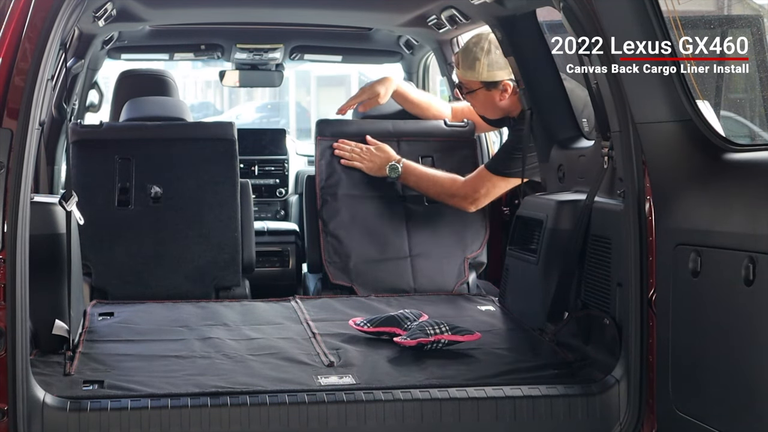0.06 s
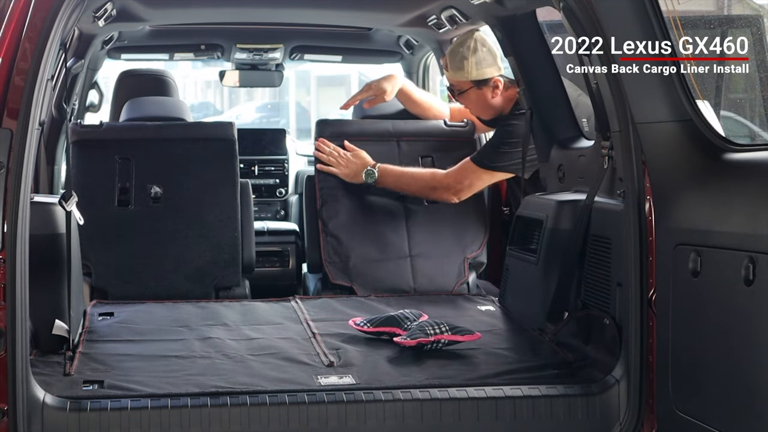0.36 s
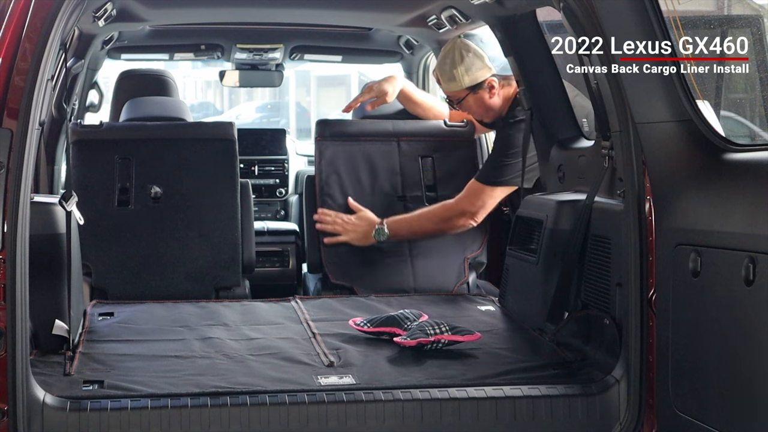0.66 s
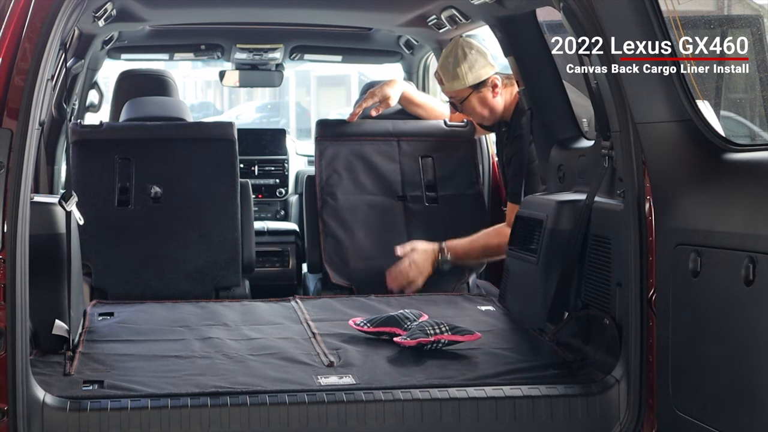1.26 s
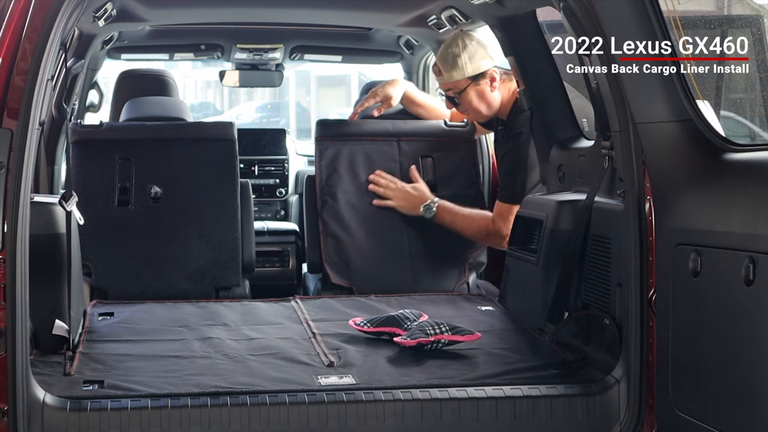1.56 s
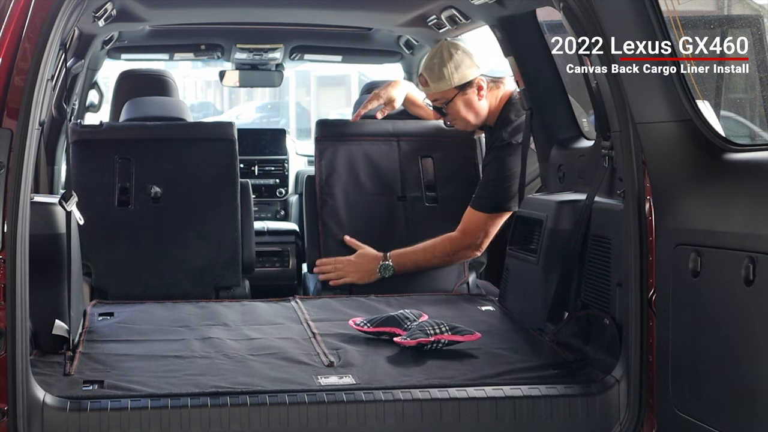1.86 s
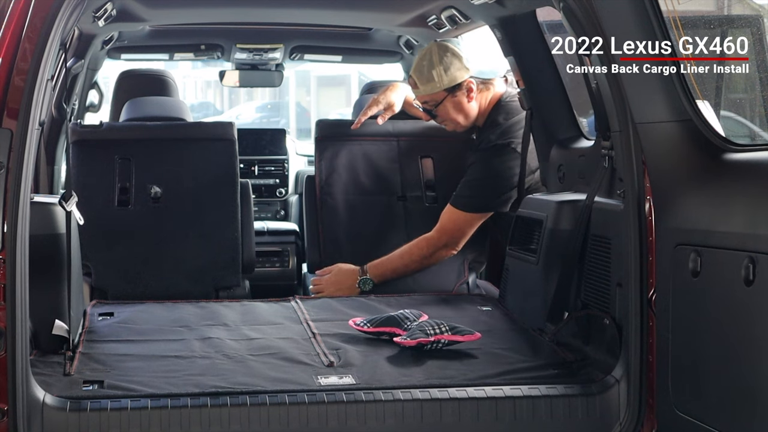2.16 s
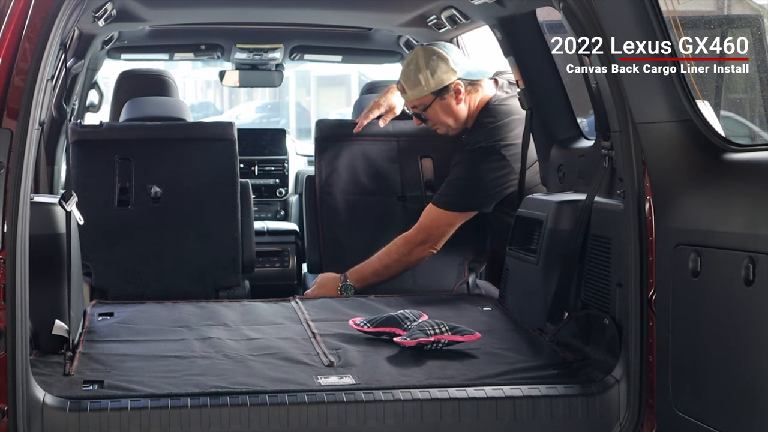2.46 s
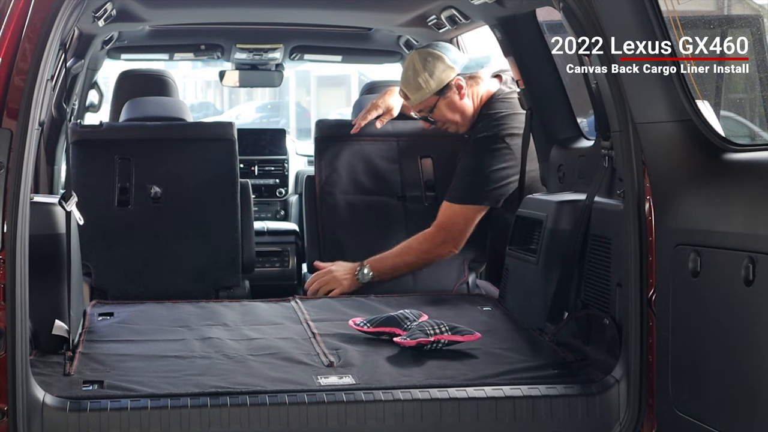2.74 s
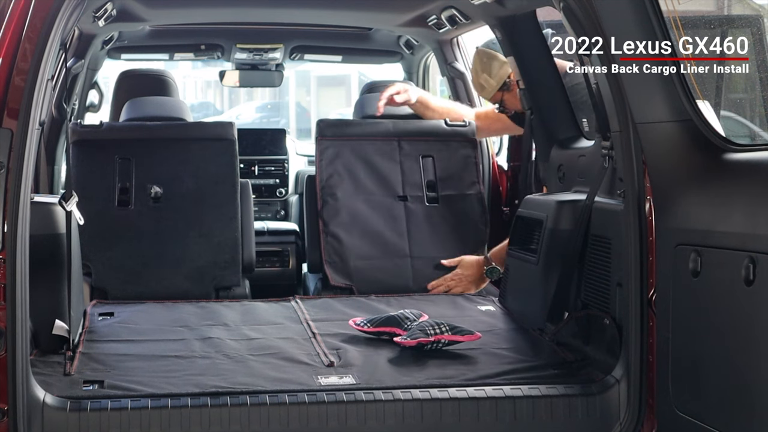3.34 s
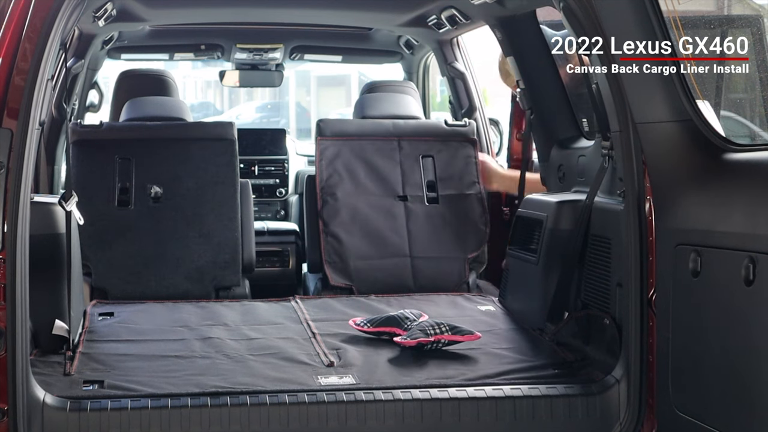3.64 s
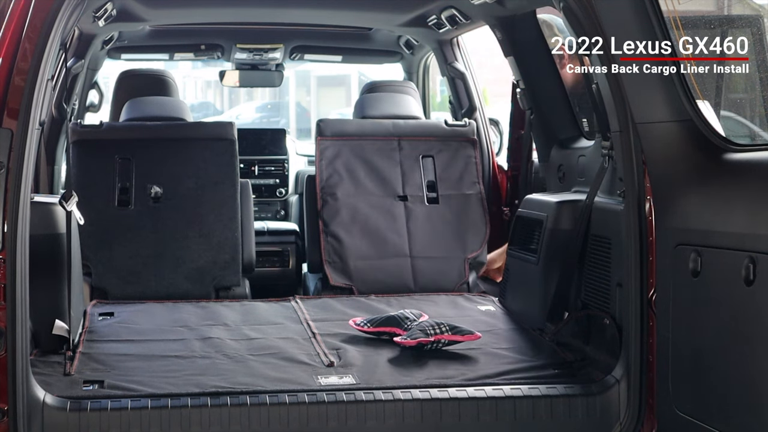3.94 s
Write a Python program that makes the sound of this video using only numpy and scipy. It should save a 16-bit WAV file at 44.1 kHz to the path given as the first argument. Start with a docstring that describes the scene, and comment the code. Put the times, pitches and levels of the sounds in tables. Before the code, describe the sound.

Three swishing sweeps of a hand over canvas, with slaps, light knocks and a low rumble.

```python
"""Smoothing a canvas seat liner

In the cargo bay of a parked car, a hand smooths canvas over a seat back. Three long strokes hiss as
skin snags on the weave, the last two starting with a slap of the palm. Fingers knock the padded panel,
the cloth ticks as it settles, the palm sticks and groans once, and a low rumble fills the cabin."""
import sys
import numpy as np
from scipy import signal
from scipy.fft import rfft, irfft
from scipy.io import wavfile
from scipy.ndimage import map_coordinates

SR = 44100
rng = np.random.default_rng(int(sys.argv[2]) if len(sys.argv) > 2 else 0)


def pcm_store(signal):
    """Save signal as 16-bit PCM."""
    levels = np.round(np.clip(np.atleast_2d(signal), -1, 1) * 32767)
    wavfile.write(sys.argv[1], SR, levels.astype(np.int16).T)


N = 176400
TIME = np.arange(N) / SR


def from_db(db):
    """Decibels to gain."""
    return 10 ** (np.asarray(db) / 20)


def unit_rms(x):
    """Scale to an rms of 1."""
    return x / np.sqrt(np.mean(x ** 2) + 1e-20)


def automation(rows, outside=None):
    """Turn rows of a time and its values into one curve per value."""
    times, *columns = np.transpose(rows)
    return [np.interp(TIME, times, column, outside, outside) for column in columns]


def coloured(x, spectrum):
    """Give steady noise a spectrum that falls away below its first point; rms 1."""
    hz, db = np.transpose(spectrum)
    f = np.maximum(np.fft.rfftfreq(N, 1 / SR), 1)
    gain = from_db(np.interp(np.log(f), np.log(hz), db)) * np.minimum(f / hz[0], 1) ** 2
    return unit_rms(irfft(rfft(x) * gain, N))


def noise(spectrum):
    """Smooth noise of a given colour."""
    return coloured(rng.standard_normal(N), spectrum)


def drift(rate_hz):
    """A random wobble, mostly slower than rate_hz; rms 1."""
    f = np.fft.rfftfreq(N, 1 / SR)
    return unit_rms(irfft(rfft(rng.standard_normal(N)) / (1 + (f / rate_hz) ** 2), N))


def burst(start, rise, hold, t60):
    """An envelope that rises up to the start, holds and dies away; times in seconds."""
    t = TIME - start
    attack = np.clip(1 + t / max(rise, 1e-4), 0, 1)
    return attack * from_db(-60 * np.clip((t - hold) / t60, 0, 2))


# The colour of the rumble. Each row: frequency in Hz, relative level in dB.
RUMBLE_COLOUR = [(20, -9), (45, -8), (90, -2.5), (200, -4), (300, 1.5), (450, -8.5), (900, -6), (1300, -12),
                 (2200, -18), (9000, -33), (15000, -31)]


def rumble():
    """A steady bed of low noise fills the cabin."""
    return noise(RUMBLE_COLOUR) * from_db(-38)


# The swell of each stroke. Each row: time in seconds, hiss level in dB, murmur level in dB.
DOWN_LEVELS = [(0, -22, -31), (.32, -27, -33.5), (.48, -25.5, -30), (.57, -17, -32.5), (.67, -15, -27),
               (.92, -15, -30.5), (.99, -19, -31), (1.17, -23.5, -33.5), (1.21, -39.5, -34),
               (1.28, -50, -38), (1.45, -56, -53)]
ACROSS_LEVELS = [(1.59, -37, -21), (1.62, -24.5, -29), (1.675, -16, -25.5), (1.8, -15, -54),
                 (1.89, -14.5, -43), (1.98, -18.5, -34), (2.04, -27, -33), (2.35, -32, -36),
                 (2.53, -34.5, -36), (2.7, -53, -43)]
OUT_LEVELS = [(3.062, -24.5, -33), (3.16, -21, -34), (3.31, -21.5, -35), (3.36, -26.5, -28.5),
              (3.42, -26, -26), (3.55, -31.5, -34), (3.61, -52, -32.5), (3.7, -91, -37), (4, -49, -42.5)]
# A close reflection combs the hiss as the hand travels.
# Each row: time in seconds, spacing of the dips in Hz, signed strength.
DOWN_COMB = [(0, 2680, .16), (.3, 2750, 0.09), (.7, 3080, 0.022), (1.15, 3470, 0.21)]
ACROSS_COMB = [(1.85, 3080, 0.013), (2.25, 3080, 0.21), (2.65, 2800, .2)]
OUT_COMB = [(3.06, 2550, -0.4), (3.15, 2540, -0.12), (3.31, 3160, -0.31), (3.55, 4150, -0.38)]
# The colour of each hiss and of the panel's murmur. Each row: frequency in Hz, relative level in dB.
DOWN_COLOUR = [(600, -18), (820, -13), (1100, -0.5), (1500, -1), (2300, 0.5), (5300, -0.5), (7200, -7),
               (14500, -12.5)]
ACROSS_COLOUR = [(680, -15.5), (950, -3.5), (1400, -7), (2300, 0), (4300, -1.5), (6700, -7), (8800, -11.5),
                 (13500, -15.5)]
OUT_COLOUR = [(500, -36), (1000, -5), (1700, 1), (3800, 0.5), (8000, -5), (13500, -15)]
MURMUR_COLOUR = [(70, 0.5), (120, 5), (280, -1), (450, 8), (1080, 6.5), (2500, -19.5)]


def stroke(levels, comb, colour):
    """Skin rubs the weave; returns its hiss, hollowed by a close reflection, and the panel's murmur."""
    snags_per_s, snag_spread_db, snag_db = 2800, 1.5, -7.5   # threads catching on the skin
    sizes = from_db(snag_spread_db * np.minimum(rng.exponential(1, N), 6)) * rng.choice([-1, 1], N)
    snags = unit_rms(sizes * (rng.random(N) < snags_per_s / SR))
    hiss = coloured(rng.standard_normal(N) + from_db(snag_db) * snags, colour)
    spacing_hz, strength = automation(comb)
    once, twice = (map_coordinates(hiss, [np.arange(N) - trips * SR / spacing_hz], order=3)
                   for trips in (1, 2))
    hiss = hiss + strength * once - .5 * np.abs(strength) * twice   # the second bounce narrows the dips
    hiss_db, murmur_db = automation(levels, outside=-120)
    grip = drift(rate_hz=37.7)   # flutters both levels together
    return np.array([unit_rms(hiss) * from_db(hiss_db + 0.47 * grip),
                     noise(MURMUR_COLOUR) * from_db(murmur_db + 2 * grip)])


def moving_peak(x, hz, width_hz, block=256):
    """A resonance whose centre glides, stepped in blocks."""
    r = np.exp(-np.pi * width_hz / SR)
    b = np.array([1, 0, -1]) * (1 - r * r) / 2
    out, state = np.zeros(N), np.zeros(2)
    for i in range(0, N, block):
        a = [1, -2 * r * np.cos(2 * np.pi * hz[i] / SR), r * r]
        out[i:i + block], state = signal.lfilter(b, a, x[i:i + block], zi=state)
    return out


# Air pockets under the moving hand.
# Each row: start and end in seconds, first and last pitch in Hz, boost or dip in dB.
AIR_POCKETS = [(0.493, 0.818, 1990, 2050, 5.5), (0.54, 0.834, 1170, 1060, 4.5),
               (.62, 1.235, 4400, 3600, 3.5), (1.159, 1.5, 2380, 2820, 13), (1.605, 1.796, 5150, 4850, 4.5),
               (1.623, 2.107, 3300, 2980, 2.5), (1.98, 2.622, 7550, 7800, -6),
               (3.32, 3.63, 1630, 2500, 7.5)]


def air_pockets(hiss, q=10.4, fade_s=0.041):
    """Air trapped under the hand boosts or swallows a gliding band of the hiss."""
    for start, end, from_hz, to_hz, db in AIR_POCKETS:
        hz = np.interp(TIME, [start, end], [from_hz, to_hz])
        fade = np.clip(np.minimum(TIME - start, end - TIME) / fade_s, 0, 1)
        hiss = hiss + (from_db(db) - 1) * fade * moving_peak(hiss, hz, from_hz / q)
    return hiss


# The modes of the padded seat back. Each row: frequency in Hz, relative level in dB, T60 in seconds.
PANEL_MODES = [(99, -9, 0.24), (150.4, -1.5, 0.091), (198, -7.5, 0.11), (265, 1.5, 0.037), (386, -1, 0.024),
               (495, -1.5, 0.025), (747, -9, 0.018), (915, -5, 0.028), (1090, -5, 0.016),
               (1302, -3.5, 0.018)]


def panel(blows, width_oct=0.64, spread_db=3.5):
    """Blows (seconds, dB, Hz) ring the seat back; each favours the modes near its own tone."""
    starts, db, tone_hz = np.transpose(blows)
    onsets = np.clip((starts * SR).astype(int), 0, N - 1)
    scatter_db = spread_db * rng.standard_normal((len(starts), len(PANEL_MODES)))
    out = np.zeros(N)
    for k, (hz, mode_db, t60) in enumerate(PANEL_MODES):
        nearness = 1 / (1 + (np.log2(hz / tone_hz) / width_oct) ** 2)
        clicks = np.full(N, 1e-18)
        clicks[onsets] = nearness * from_db(db + mode_db + scatter_db[:, k])
        r, w = np.exp(-np.log(1000) / (t60 * SR)), 2 * np.pi * hz / SR
        out += (-1) ** k * signal.lfilter([0, np.sin(w)], [1, -2 * r * np.cos(w), r * r], clicks)
    return out


# Fingers knocking the panel. Each row: start in seconds, level in dB, centre of the tone in Hz.
FINGER_KNOCKS = [(0.9592, -7.5, 1150), (0.9996, -5.5, 990), (1.040, -8.5, 755), (1.078, -5.5, 820),
                 (1.095, -18.5, 202), (1.197, -17, 550), (1.43, -21, 880), (1.649, -6, 960),
                 (1.899, -9.5, 446), (1.932, -21, 302), (2, -12, 830), (2.191, -8, 790),
                 (2.531, -22.5, 300), (2.898, -19, 360), (3.363, -22, 280), (3.405, -14, 101),
                 (3.424, -17, 232), (3.467, -22, 268), (3.495, -23, 232), (3.971, -26, 242)]


def knocks(push_db=-1.5, second_gap_s=0.00418, second_db=-6.5):
    """A finger bumps the panel and rebounds for a second, softer hit; the first contact also gives the cloth
    one short push."""
    pushes, rebounds = np.zeros(N), []
    for start, db, hz in FINGER_KNOCKS:
        phase = np.clip(2 * np.pi * hz * (TIME - start), -20, 20)
        pushes += from_db(db + push_db) * phase * np.exp(-phase ** 2 / 2)
        rebounds.append((start + second_gap_s * rng.uniform(0.48, 2.02), db + second_db, hz))
    return pushes + panel(FINGER_KNOCKS) + panel(rebounds)


# Ticks and brushes of settling cloth. Each row: peak time in seconds, level in dB, rise and T60 in seconds.
CLOTH_TICKS = [(1.219, -19.5, 0.0015, 0.038), (1.233, -24, 0.0013, 0.04), (1.262, -27, 0.00092, 0.027),
               (1.35, -36, 0.0019, .028), (1.431, -35, 0.0011, 0.02), (2.78, -36, 0.045, 0.3),
               (2.806, -28, 0.0013, 0.052), (2.898, -35, .001, 0.016), (3.686, -23, 0.00086, 0.028),
               (3.701, -26, 0.00091, 0.012)]
# Their crisp colour. Each row: frequency in Hz, relative level in dB.
TICK_COLOUR = [(700, 4), (2600, 10.5), (6500, 1), (14000, -16)]


def ticks():
    """Short crisp rustles as folds let go."""
    envelope = sum(from_db(db) * burst(peak, rise, 0, t60) for peak, db, rise, t60 in CLOTH_TICKS)
    return noise(TICK_COLOUR) * envelope


# Slaps of the palm. Each row: start in seconds, smack level in dB, lead of the fingertips in seconds,
# fingertip level in dB, thump level in dB, delay of the heel in seconds.
PALM_SLAPS = [(1.575, -8.5, 0.0036, -14.5, -3.5, 0.0075), (3.0784, -8, 0.0083, -15.5, -2, .0056)]
# The colour of the smack. Each row: frequency in Hz, relative level in dB.
SMACK_COLOUR = [(170, -0.5), (320, 6.5), (650, 6), (1050, 8), (1700, 1), (14000, -34)]


def slaps(t60=0.055, tips_hz=3280, thump_hz=293, heel_db=-8):
    """Fingertips land first, then the palm smacks the cloth and, with the heel, thumps the panel."""
    tips = noise([(tips_hz / 3, 0), (tips_hz, -2), (7000, -10), (14000, -20)])
    smack = noise(SMACK_COLOUR)
    out, blows = np.zeros(N), []
    for start, smack_db, lead, tips_db, thump_db, heel_delay in PALM_SLAPS:
        out += tips * from_db(tips_db) * burst(start - lead, rise=0, hold=lead, t60=t60)
        out += smack * from_db(smack_db) * burst(start, rise=0.0019, hold=0.004, t60=t60)
        blows += [(start, thump_db, thump_hz), (start + heel_delay, thump_db + heel_db, thump_hz)]
    return out + panel(blows)


def groan(pitch_hz=294, waver_hz=24):
    """The palm briefly sticks and slips on the cloth at a wavering low pitch."""
    phase = 2 * np.pi * np.cumsum(pitch_hz + waver_hz * drift(rate_hz=37.7)) / SR
    return from_db(-26) * np.sin(phase) * burst(start=2.12, rise=0.019, hold=0.038, t60=0.076)


def cabin(x, t60=0.14, cutoff_hz=6000):
    """A short, dull tail from the upholstered cabin, arriving from the sides."""
    t = TIME[:SR // 4]
    tail = rng.standard_normal(len(t)) * np.exp(-np.log(1000) * t / t60)
    tail = signal.sosfilt(signal.butter(1, cutoff_hz, fs=SR, output="sos"), tail)
    reverb = signal.fftconvolve(x, tail / np.linalg.norm(tail))[:N]
    return np.array([reverb, -reverb])   # opposite polarity left and right


def scene():
    """Hand and rumble sit in the centre, with a faint cabin tail around them."""
    hiss, murmur = (stroke(DOWN_LEVELS, DOWN_COMB, DOWN_COLOUR)
                    + stroke(ACROSS_LEVELS, ACROSS_COMB, ACROSS_COLOUR)
                    + stroke(OUT_LEVELS, OUT_COMB, OUT_COLOUR))
    hand = air_pockets(hiss) + murmur + slaps() + knocks() + ticks() + groan()
    sound = hand + rumble()
    return sound + from_db(-34) * cabin(sound)


def record(dry):
    """The loudest peaks are rounded, bass and treble roll off, and the top is cut."""
    ceiling, bass_hz, treble_hz, top_hz = 1.1, 73, 13640, 15600
    x = dry / (1 + (dry / ceiling) ** 4) ** .25
    x = signal.sosfilt(signal.butter(2, bass_hz, "high", fs=SR, output="sos"), x)
    x = signal.sosfilt(signal.butter(6, treble_hz, fs=SR, output="sos"), x)
    return signal.sosfilt(signal.ellip(10, .1, 80, top_hz, fs=SR, output="sos"), x)


dry = scene()
out = record(dry)
pcm_store(out)
```